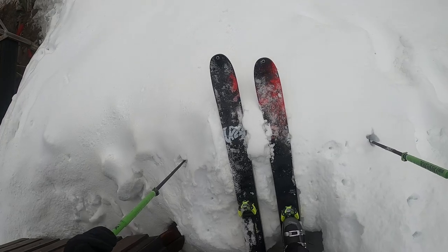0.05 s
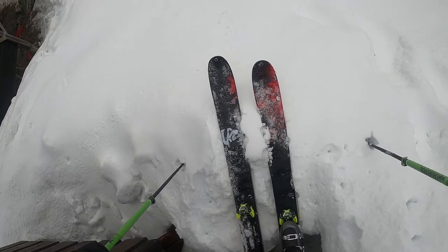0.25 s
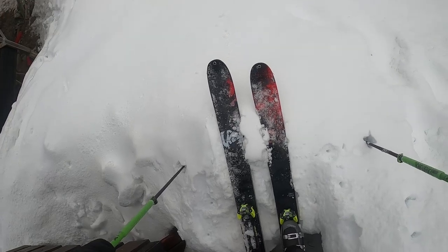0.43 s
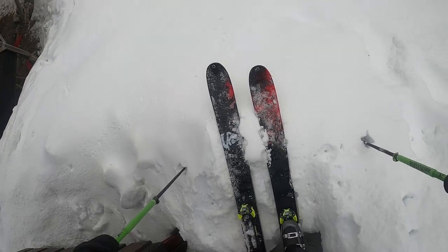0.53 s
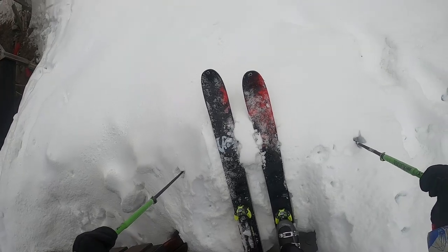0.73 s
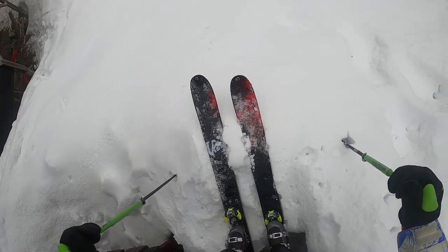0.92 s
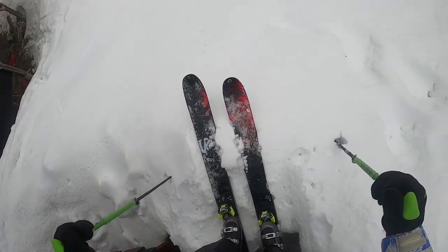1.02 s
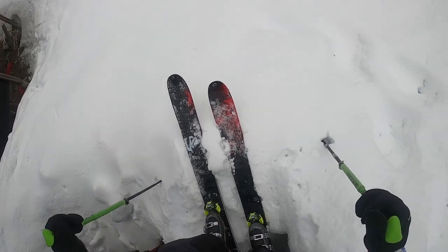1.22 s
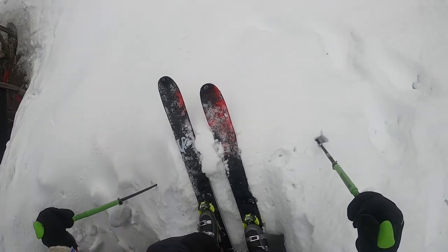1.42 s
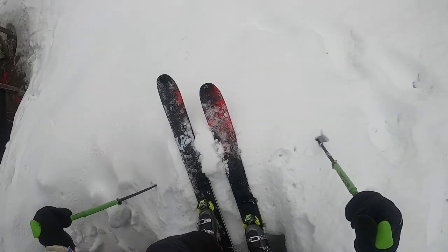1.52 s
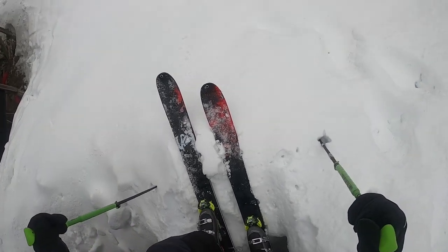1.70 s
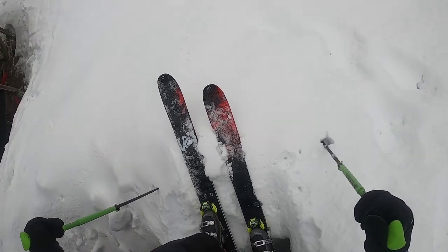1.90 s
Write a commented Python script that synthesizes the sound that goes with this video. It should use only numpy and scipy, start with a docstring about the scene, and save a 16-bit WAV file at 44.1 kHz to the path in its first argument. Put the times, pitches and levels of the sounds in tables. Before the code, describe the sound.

Skis shift on packed snow, heard close up. A sharp clack with a crunch and a dull thud comes at about 0.2 seconds, followed by smaller crunches and pole taps until 0.6. After a lull, more crunches, binding clicks and thumps come at about 1.1 and 1.4 seconds, thinning to faint ticks. Clothing rustles softly over a faint low outdoor rumble.

```python
"""Skis shifting on packed snow

A standing skier moves skis and poles, heard from a camera worn on the body. Impacts set the gear
clacking in its damped modes, and the skis thud as they flex. The crust fails by brittle fracture,
in clusters of tiny cracks with crumbs trickling after. Clothing rustles softly by friction
over a faint low outdoor rumble."""
import sys
import numpy as np
from scipy import signal
from scipy.fft import rfft, irfft
from scipy.io import wavfile
from scipy.ndimage import uniform_filter1d

SR = 44100
rng = np.random.default_rng(int(sys.argv[2]) if len(sys.argv) > 2 else 0)


def to_wav(s):
    """Save 16-bit WAV."""
    ch = np.atleast_2d(s).T  # columns
    pcm = np.round(np.clip(ch, -1, 1) * 32767)  # PCM
    wavfile.write(sys.argv[1], SR, pcm.astype(np.int16))


N = 85995

# cracks of snow and gear: t/s, body level/dB, middle level/dB, treble level/dB, decay/s
CRACKS = [(0.083, -81, -50, -51, .001), (.108, -68, -54.5, -57, 0.0014), (.137, -63, -53, -58.5, 0.0036),
          (.188, -59, -37.5, -48, 0.0024), (.196, -49.5, -41, -53, 0.0038), (.224, -41, -30, -40, 0.0034),
          (0.2327, -20.5, -14, -42, 0.0019), (0.2337, -25.5, -20.5, -19, 0.0023),
          (.257, -28.5, -35, -45, 0.0021), (.306, -35, -33.5, -40.5, 0.0018), (.322, -37, -41, -62, 0.0043),
          (0.3279, -39.5, -35, -45, 0.0039), (.402, -30.5, -30, -44, 0.0038),
          (.414, -31.5, -40, -59, 0.0019), (.422, -39, -40, -67, 0.0026), (.433, -60, -37, -44, 0.0018),
          (.446, -58, -31, -38, 0.0022), (.451, -42, -33, -48, 0.0037), (0.5199, -27, -21.5, -33, 0.0035),
          (.529, -48, -33.5, -31.5, 0.0044), (.532, -32, -23.5, -34, 0.0021),
          (.543, -30.5, -24, -32.5, 0.0035), (.547, -24, -28, -76, 0.0021), (0.56, -36, -36.5, -50, 0.0059),
          (.583, -46, -41.5, -47.5, 0.0019), (.592, -42, -46, -61, 0.0034),
          (.609, -43.5, -47.5, -65, 0.0022), (.632, -55, -51, -76, .002), (.878, -78, -52, -74, 0.0017),
          (0.98, -72, -60.5, -48.5, 0.0011), (1.005, -74.5, -54.5, -70.5, .0015),
          (1.037, -53.5, -48, -66, 0.0023), (1.0449, -44.5, -40.5, -52.5, 0.0031),
          (1.082, -44, -43, -59, 0.0049), (1.108, -24, -19.5, -37, 0.003), (1.113, -35.5, -39, -38, 0.0071),
          (1.1325, -33.5, -23.5, -28.5, 0.0027), (1.143, -38, -33, -44, 0.0035),
          (1.156, -42, -22.5, -30.5, 0.0021), (1.168, -27.5, -26.5, -40.5, 0.0046),
          (1.222, -45, -40, -45, 0.0026), (1.241, -52, -42.5, -48, 0.0056),
          (1.251, -46, -52.5, -70, 0.0069), (1.287, -71, -47.5, -62, 0.0044),
          (1.37, -43, -37.5, -43.5, 0.0024), (1.383, -46, -37, -52, 0.0038),
          (1.388, -28.5, -23.5, -30, 0.0018), (1.3954, -26, -25, -33.5, 0.0017),
          (1.402, -32, -34, -47, 0.0025), (1.417, -40, -40, -49, 0.0026), (1.422, -36, -39.5, -41, 0.0024),
          (1.477, -66, -44.5, -45, 0.0019), (1.486, -64, -43, -47, 0.0019), (1.503, -49, -44, -53, 0.0044),
          (1.512, -38.5, -48, -56.5, 0.0023), (1.534, -55, -50.5, -81, 0.0039),
          (1.802, -51, -44.5, -53, 0.0025), (1.924, -75, -45, -52.5, 0.0029), (1.945, -53, -53, -58, .003)]
# spectra of the three registers of a crack: f/Hz, level/dB
CRACK_BODY = [(80, -24), (200, 0.5), (330, 2.5), (600, -2.5), (850, -9), (1300, -12), (3000, -58),
              (9000, -79.5)]
CRACK_MIDDLE = [(400, -35.5), (800, -3.5), (1050, 4), (1300, 2), (1650, 3.5), (2400, -4), (3000, -4.5),
                (3800, -16), (6000, -43), (14000, -68)]
CRACK_TREBLE = [(1800, -22.5), (3500, 1), (4400, -2), (5800, -7.5), (7000, -6), (8500, -13.5),
                (10500, -22.5), (12500, -24.5), (14000, -37.5), (16000, -43.5)]
# modes of hard gear, ski, boot, the ski's hollow shell and pole: f/Hz, level/dB, T60/s
GEAR_MODES = [(930, -10, 0.016), (1350, 0.5, 0.017), (1572, 0.5, 0.016), (2102, -8, 0.0094),
              (2940, -10, 0.023), (3486, -1.5, 0.011), (4460, -20, 0.026), (5050, -10.5, 0.015),
              (5920, -24, 0.025), (6870, -20, .013), (7900, -21, 0.01405)]
SKI_MODES = [(663, -9.5, 0.015), (866, 3.5, 0.0096), (1115, -1.5, 0.0093), (1635, -9.5, 0.028),
             (3005, -18, 0.044)]
BOOT_MODES = [(330, -1, 0.085), (478, -5.5, 0.1), (1000, -11.5, 0.082), (1540, -3, .06), (2750, -9, .03),
              (4000, -10, 0.045)]
SKI_SHELL_MODES = [(597, 0.5, 0.056), (927, 3, 0.035), (1075, 1.5, 0.044), (1663, -10, 0.055)]
POLE_MODES = [(1270, -11.5, .03), (1628, 1, .045), (1750, -3.5, .04), (3160, -9, .03)]
# impacts on each of them (the gear's clack is a double contact): t/s, level/dB
GEAR_KNOCKS = [(.2346, -13), (.23598, -13)]
SKI_KNOCKS = [(.4022, -16), (.5208, -25), (1.1078, -34)]
BOOT_KNOCKS = [(1.3895, -34), (1.3983, -32.5)]
SKI_SHELL_KNOCKS = [(.5475, -32.5), (1.1085, -37.5), (1.1685, -26.5)]
POLE_TAPS = [(.189, -36), (.197, -41), (.329, -40), (.378, -48), (.452, -40), (.492, -46), (.56, -38),
             (.594, -44), (.651, -58), (.667, -60), (.682, -56.5), (.697, -57)]
# skis thudding on the snow: t/s, initial f/Hz, peak level/dB, rise/s
THUDS = [(.238, 137, -24.5, 0.0058), (.252, 161, -17.5, 0.0061), (0.271, 121, -25, 0.00984),
         (.305, 64.6, -24, 0.016), (0.404, 62.3, -42, 0.028), (0.52, 73.1, -31, 0.018),
         (.528, 157.7, -36.5, 0.012), (.585, 60.4, -41, 0.018), (1.110, 148, -19, 0.0027),
         (1.162, 120, -19.5, 0.0027), (1.167, 74.5, -39, 0.016), (1.502, 183, -38.5, .005)]
# snow packing under the skier's weight: t/s, duration/s, level/dB, release/s
CRUNCHES = [(0.196, 0.059, -44, 0.015), (0.296, 0.03, -46, 0.03), (0.391, 0.066, -49.5, 0.015),
            (0.516, 0.048, -40, .022), (0.629, 0.069, -64.5, 0.012), (1.105, .07, -35.5, .015),
            (1.21, 0.32, -69.5, .03), (1.354, 0.058, -49, .018), (1.468, 0.019, -54, 0.023)]
# spectra of snow grains, padded fabric, jacket shell and outdoor rumble: f/Hz, level/dB
CRUNCH_SPECTRUM = [(100, -4.5), (250, 2.5), (600, -1.5), (1100, -3), (1700, -0.5), (2400, -11), (3100, -9),
                   (4500, -19), (7000, -22), (10000, -34), (12500, -41), (15000, -57.5)]
RUB_SPECTRUM = [(80, -12), (160, -4), (250, 4), (350, -3.5), (480, -8.5), (620, -17.5), (900, -33.5),
                (2000, -53), (6000, -85)]
RUSTLE_SPECTRUM = [(100, -13), (300, -2.5), (550, -6.5), (850, -8.5), (1300, -1), (1750, -0.5),
                   (2400, -4.5), (3100, -7), (4000, -12), (5200, -11), (6300, -17), (8000, -19),
                   (11000, -31.5), (15000, -46)]
RUMBLE_SPECTRUM = [(15, -45), (28, -14.5), (55, 5.5), (85, -1), (120, -0.5), (170, -13), (240, -26.5),
                   (450, -45), (1000, -66.5), (4000, -100)]
# envelopes of padded fabric, jacket shell and outdoor rumble: t/s, level/dB
RUB_ENVELOPE = [(0, -86), (.22, -69), (.26, -48.5), (.36, -60), (.62, -69), (.78, -81.5), (.95, -69),
                (1.3, -58), (1.6, -65), (1.75, -59.5), (1.9, -66), (1.95, -55)]
RUSTLE_ENVELOPE = [(0, -74), (.15, -65.5), (.35, -61), (.62, -71.5), (.78, -75.5), (.88, -69.5), (1, -68),
                   (1.34, -57.5), (1.45, -63.5), (1.62, -67.5), (1.72, -61.5), (1.88, -64), (1.95, -64)]
RUMBLE_ENVELOPE = [(0, -70), (.17, -79), (.25, -31.5), (.45, -53.5), (.65, -51), (.8, -57.5), (.87, -58),
                   (1.02, -53.5), (1.15, -39.5), (1.35, -46.5), (1.6, -49), (1.95, -53.5)]
# left microphone port relative to the right: f/Hz, level/dB
PORT_BALANCE = [(100, 0.8), (1700, -0.7), (2500, 1), (3500, 1.5), (4600, -4), (6800, -7), (8000, -1),
                (9000, 1.5), (10200, -4), (12000, -6), (14000, -3.5)]
# phase of the left port relative to the right: f/Hz, phase/rad
PORT_PHASE = [(30, -.02), (300, -.1), (700, -.2), (1450, -.52), (2500, -.72), (4500, -1.05), (6600, -1.2),
              (8300, -.5), (10000, -1.4), (13000, -1.6)]
# sound scattered off body and snow: f/Hz, level/dB
SCATTER_SPECTRUM = [(100, -34), (500, -30), (1000, -25), (3000, -19), (7000, -14), (14000, -8)]


def cracks(rise_s=0.00058, tail_db=-27.5, tail_s=0.014, spread=0.54, size=4096):
    """Brittle fracture: each crack is a fast-dying burst of tiny breaks with a faint tail."""
    out, t = np.zeros(N), np.arange(size) / SR
    registers = [response(spectrum) for spectrum in (CRACK_BODY, CRACK_MIDDLE, CRACK_TREBLE)]
    for start, *levels, decay in CRACKS:
        envelope = (1 - np.exp(-t / rise_s)) * (np.exp(-t / decay) + undb(tail_db) * np.exp(-t / tail_s))
        for db, register in zip(levels, registers):
            push, strength = rng.standard_normal((2, size))
            burst = through(envelope * push * np.exp(spread * strength), register)
            add(out, start, unit(burst) * undb(db) * np.sqrt(2 * np.mean(envelope ** 2)))
    return out


def knocks(impacts, modes, size=8192):
    """Free vibration: a struck object rings as a sum of exponentially damped normal modes."""
    out, t = np.zeros(N), np.arange(size) / SR
    ring = sum((-1) ** k * undb(db) * np.sin(2 * np.pi * hz * t) * np.exp(-np.log(1000) * t / t60)
               for k, (hz, db, t60) in enumerate(modes))
    for start, db in impacts:
        add(out, start, undb(db) * ring)
    return out


def ski_thuds(sag_per_s=6.6):
    """Damped flexure: a ski bends against the snow in a low swell whose pitch sags as it settles."""
    out = np.zeros(N)
    for start, hz, db, rise in THUDS:
        t = since(start)
        cycles = hz * np.log1p(sag_per_s * t) / sag_per_s  # integral of hz / (1 + sag_per_s * t)
        swell = (t / rise * np.exp(1 - t / rise)) ** 2
        out += undb(db) * swell * np.sin(2 * np.pi * cycles)
    return out


def snow_crunch(rise_s=0.0068, grains_per_s=5400, spread_db=3.5):
    """Shot noise: uneven grains give way at random while the snow is loaded, then trickle out."""
    envelope = sum(undb(db) * (1 - np.exp(-since(start) / rise_s))
                   * np.exp(-since(start + duration) / release)
                   for start, duration, db, release in CRUNCHES)
    sizes = undb(spread_db * np.minimum(rng.exponential(size=N), 4))
    grains = (rng.random(N) < grains_per_s / SR) * sizes * rng.choice([-1, 1], N)
    return envelope * unit(through(grains, response(CRUNCH_SPECTRUM)))


def clothing(flicker_db=1, grit=0.45, side_db=-7.5):
    """Friction noise: padded fabric rubs dully, and the shell's fine creases give a wider rustle."""
    flicker = unit(uniform_filter1d(uniform_filter1d(rng.standard_normal(N), size=500), size=500))
    slips = rng.standard_normal(N) * np.exp(grit * rng.standard_normal(N))
    creases = unit(through(slips, response(RUSTLE_SPECTRUM)))
    rustle = creases + undb(side_db) * noise(RUSTLE_SPECTRUM) * np.array([[1], [-1]])
    rub = noise(RUB_SPECTRUM) * undb(curve(RUB_ENVELOPE))
    return rub + rustle * undb(curve(RUSTLE_ENVELOPE) + flicker_db * flicker)


def background(drone_hz=168.5, bandwidth_hz=34, drone_db=-67.5):
    """Band-limited noise: a broad low band is heard as rumble, a narrow one as a faint far drone."""
    resonance = signal.iirpeak(drone_hz, drone_hz / bandwidth_hz, fs=SR)
    drone = signal.lfilter(*resonance, noise([(60, -30), (drone_hz, 0), (400, -30)]))
    rumble = noise(RUMBLE_SPECTRUM) * undb(curve(RUMBLE_ENVELOPE))
    return rumble + undb(drone_db) * unit(drone)


def microphone_ports(x, scatter_s=.008, size=2048):
    """Path difference and scattering off body and snow: two close ports differ in level and phase."""
    padded = 2 * N
    split = np.sqrt(undb(across(PORT_BALANCE, padded))) * np.exp(.5j * across(PORT_PHASE, padded))
    echoes = rng.standard_normal(size) * np.exp(-np.arange(size) / SR / scatter_s)
    scatter = rfft(echoes / np.linalg.norm(echoes), padded) * undb(across(SCATTER_SPECTRUM, padded))
    left_right = np.array([split + scatter, 1 / split - scatter])
    return irfft(rfft(x, padded) * left_right)[:, :N]


def undb(db):
    """Amplitude ratio of a level in decibels."""
    return 10 ** (np.asarray(db) / 20)


def unit(x):
    """Normalisation to rms 1."""
    return x / np.sqrt(np.mean(x ** 2) + 1e-18)


def since(start):
    """Seconds elapsed since an onset, zero before it."""
    return np.maximum(np.arange(N) / SR - start, 0)


def curve(points):
    """Linear interpolation of (t/s, value) points."""
    return np.interp(since(0), *np.array(points).T)


def across(points, size):
    """Log-frequency interpolation of (f/Hz, value) points onto Fourier bins."""
    hz, value = np.array(points, float).T
    bins_hz = np.maximum(np.fft.rfftfreq(size, 1 / SR), 1)
    return np.interp(np.log(bins_hz), np.log(hz), value)


def response(spectrum, size=4096):
    """Minimum-phase impulse response of a spectrum, by folding its cepstrum."""
    cepstrum = irfft(np.log(undb(across(spectrum, size))))
    cepstrum[1:size // 2] *= 2
    cepstrum[size // 2 + 1:] = 0
    return irfft(np.exp(rfft(cepstrum)))


def through(x, impulse_response):
    """Linear filtering by convolution."""
    return signal.fftconvolve(x, impulse_response)[:len(x)]


def noise(spectrum):
    """Spectral shaping of white noise, at rms 1."""
    return unit(through(rng.standard_normal(N), response(spectrum)))


def add(out, start, x):
    """Superposition of a sound at its onset time."""
    i = max(int(start * SR), 0)
    out[i:i + len(x)] += x[:max(len(out) - i, 0)]


def scene():
    """Superposition: gear, snow and background reach the two ports, and nearby clothing adds to them."""
    gear = (knocks(GEAR_KNOCKS, GEAR_MODES) + knocks(SKI_KNOCKS, SKI_MODES)
            + knocks(BOOT_KNOCKS, BOOT_MODES) + knocks(SKI_SHELL_KNOCKS, SKI_SHELL_MODES)
            + knocks(POLE_TAPS, POLE_MODES))
    return microphone_ports(gear + cracks() + ski_thuds() + snow_crunch() + background()) + clothing()


def record(dry):
    """Band limiting: the camera cuts the deepest bass and the highest treble."""
    bottom_hz, top_hz = 30, 15900
    x = signal.sosfilt(signal.butter(2, bottom_hz, "highpass", fs=SR, output="sos"), dry)
    return signal.sosfilt(signal.ellip(8, .2, 70, top_hz, fs=SR, output="sos"), x)


dry = scene()
out = record(dry)
to_wav(out)
```